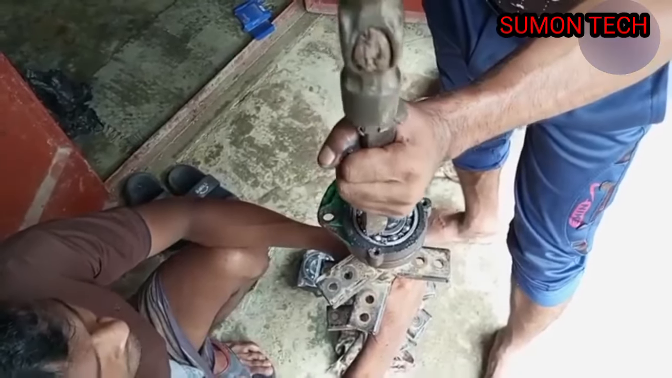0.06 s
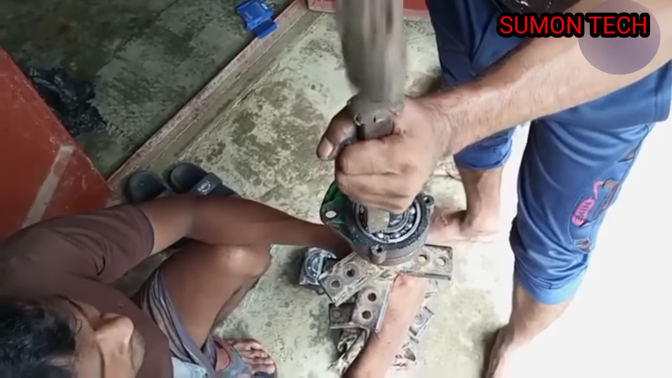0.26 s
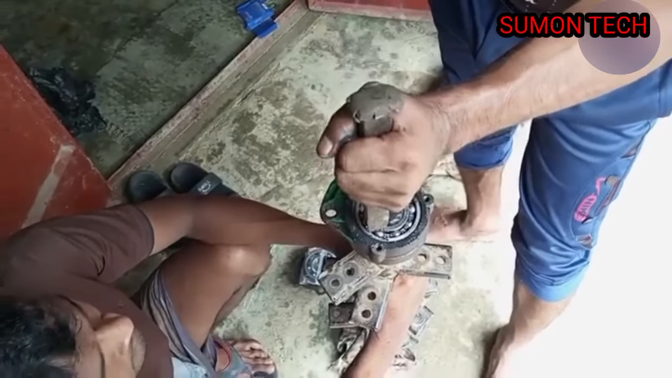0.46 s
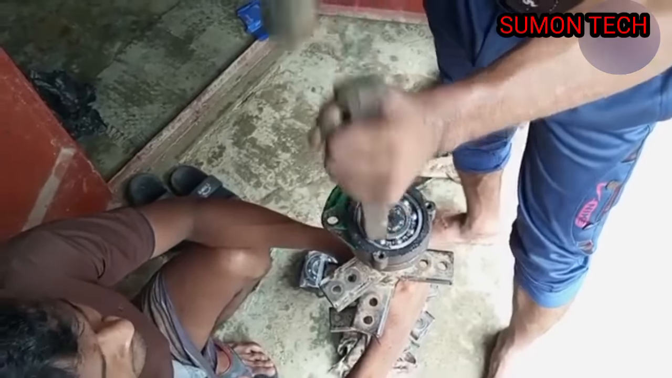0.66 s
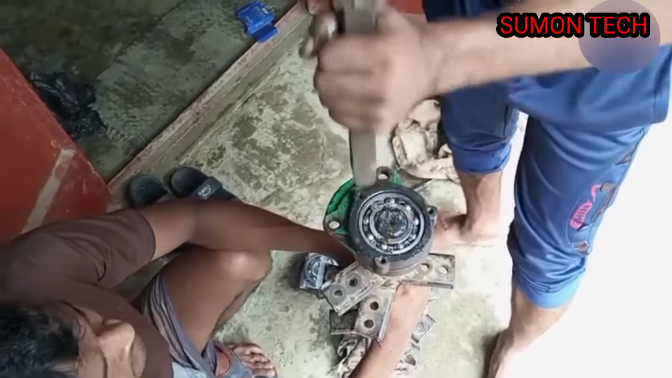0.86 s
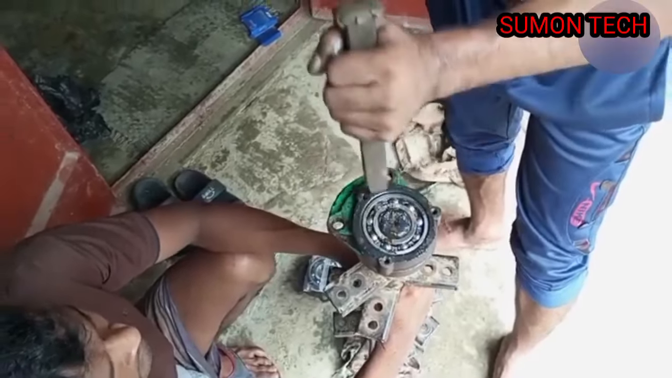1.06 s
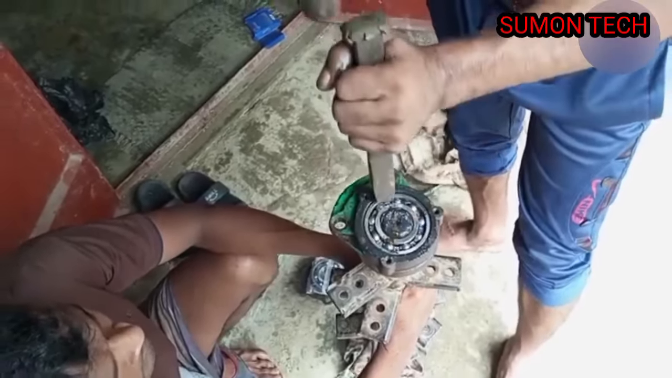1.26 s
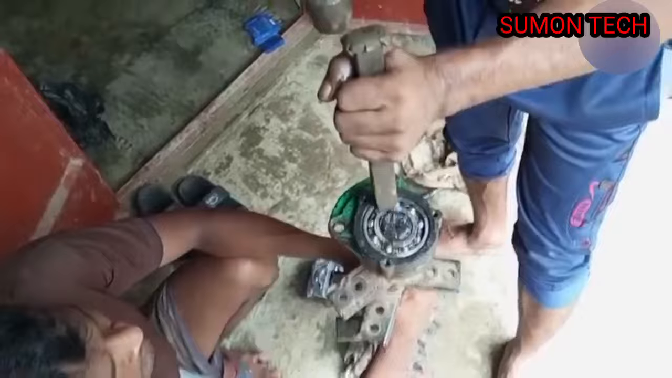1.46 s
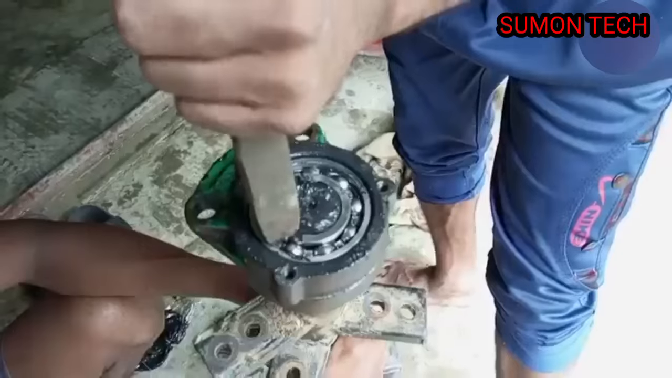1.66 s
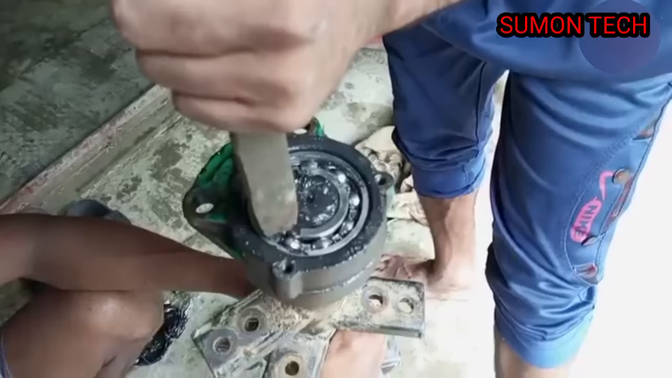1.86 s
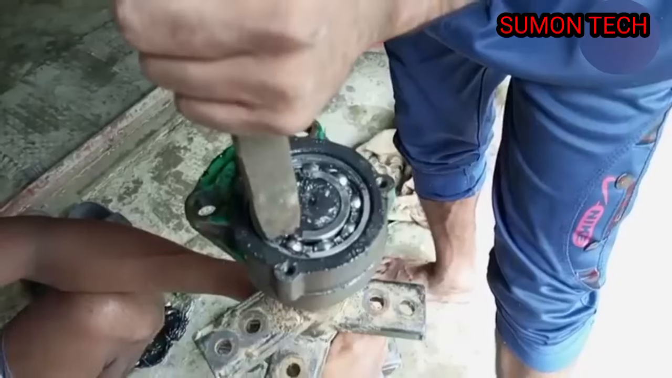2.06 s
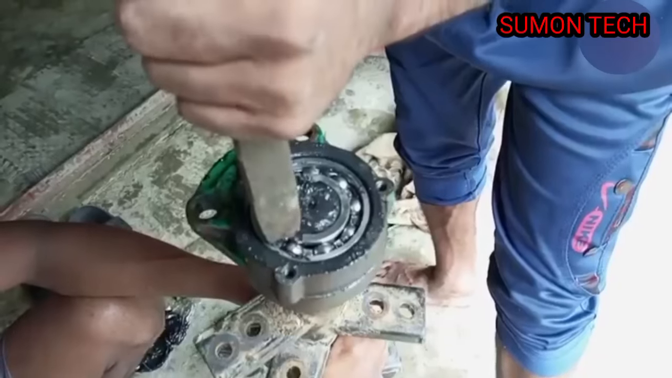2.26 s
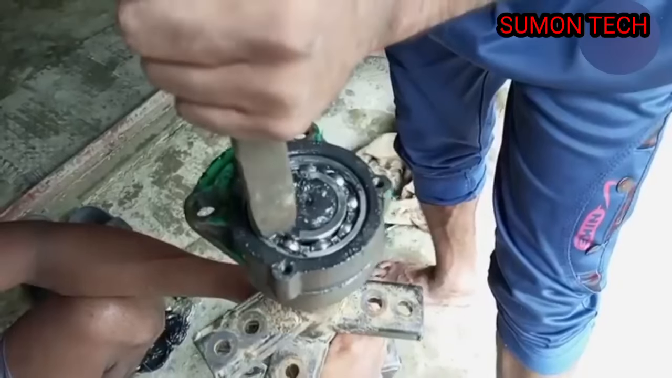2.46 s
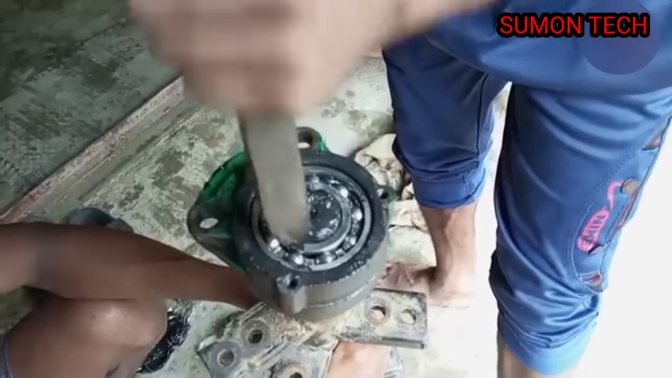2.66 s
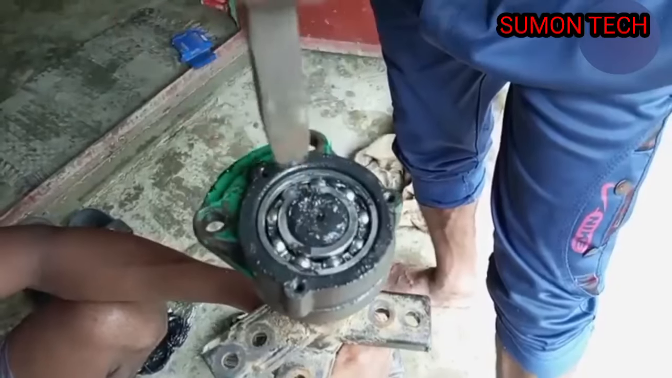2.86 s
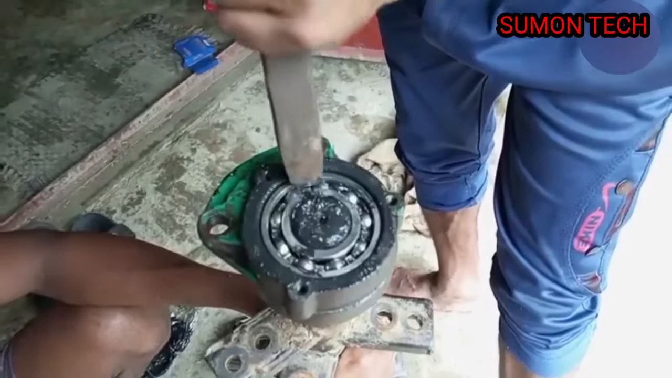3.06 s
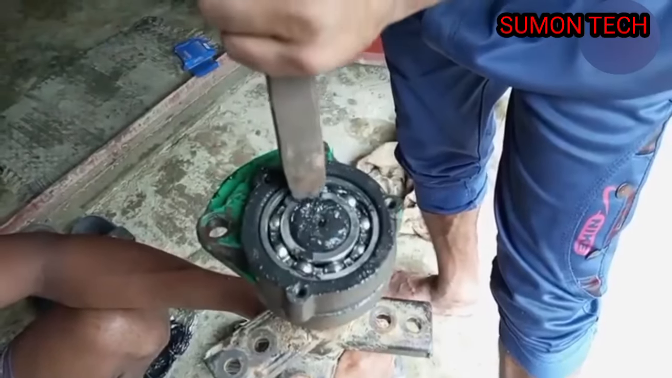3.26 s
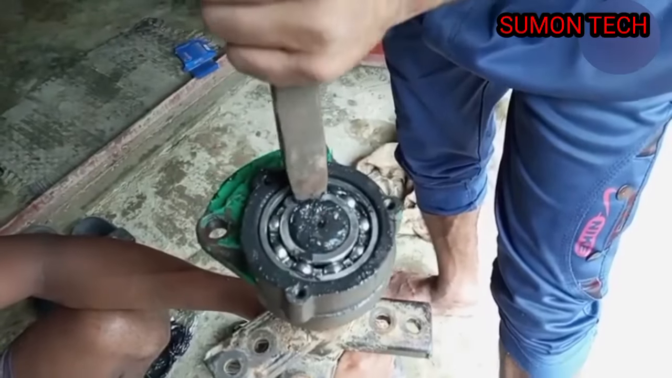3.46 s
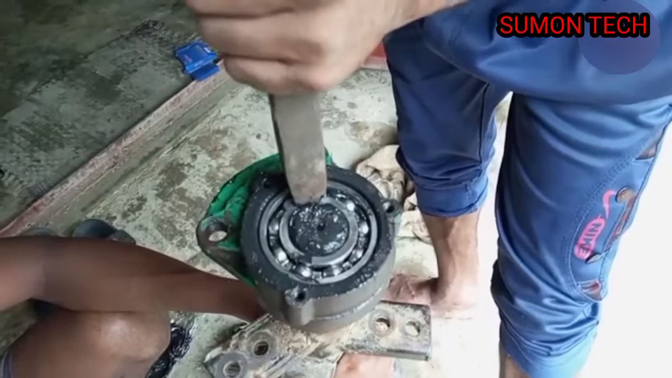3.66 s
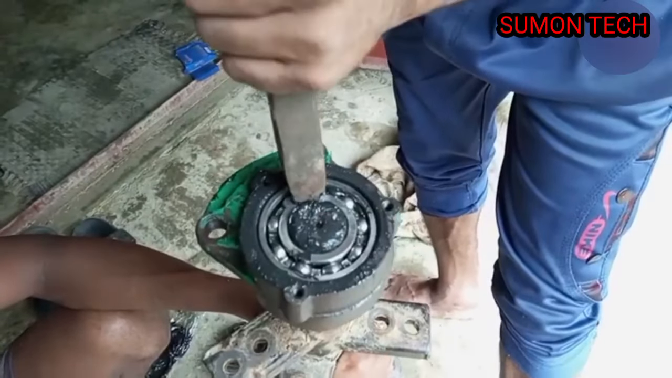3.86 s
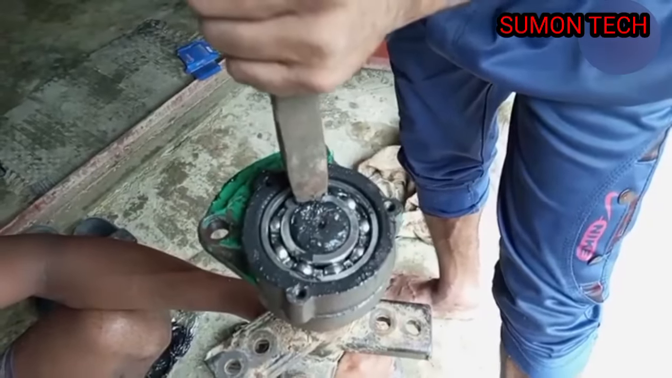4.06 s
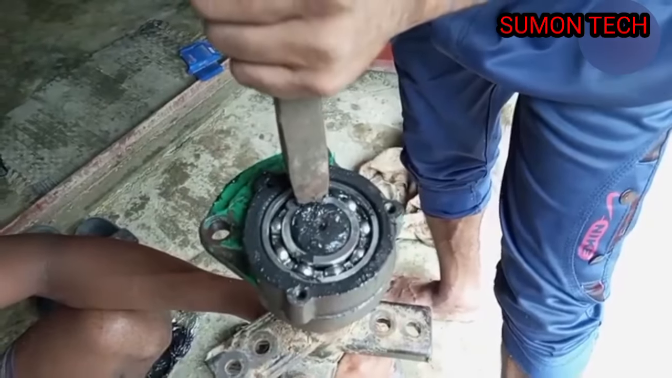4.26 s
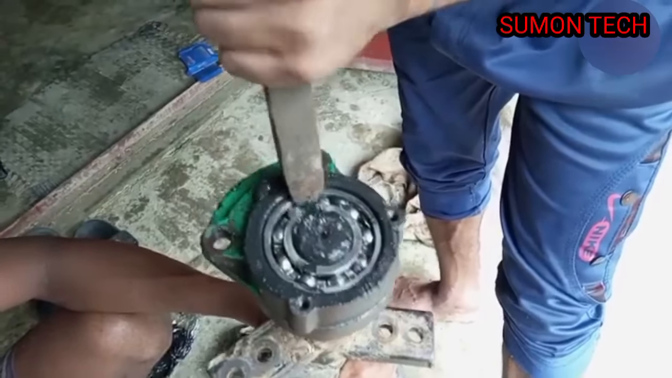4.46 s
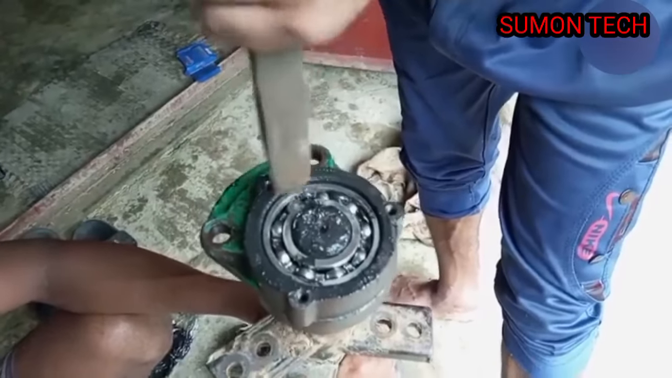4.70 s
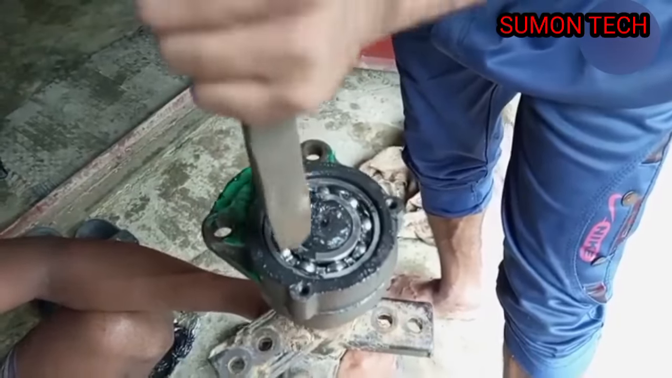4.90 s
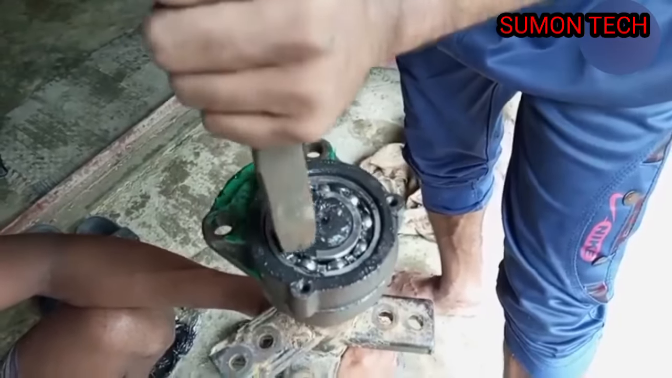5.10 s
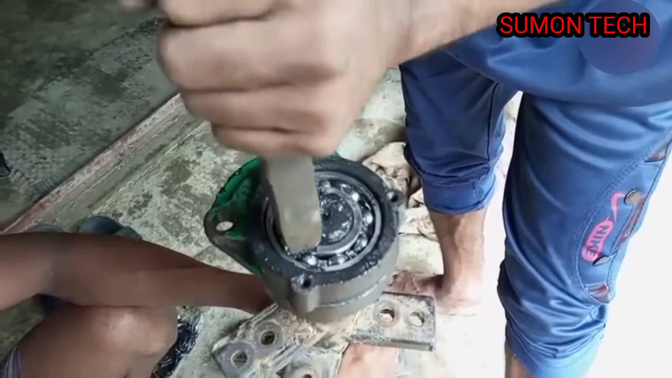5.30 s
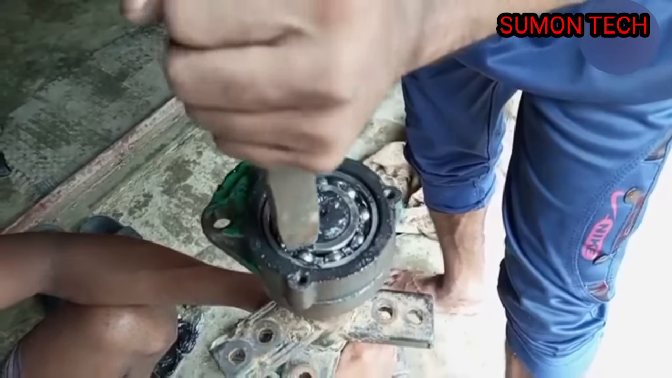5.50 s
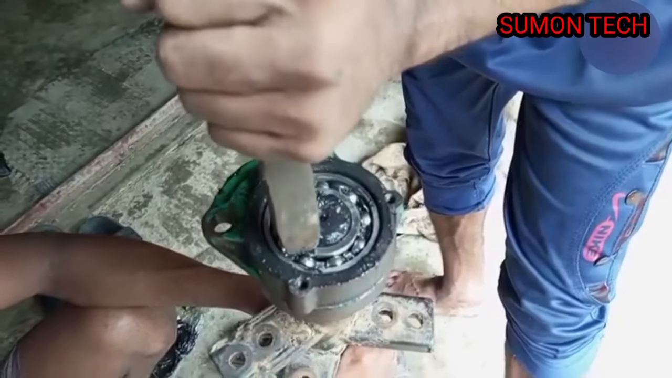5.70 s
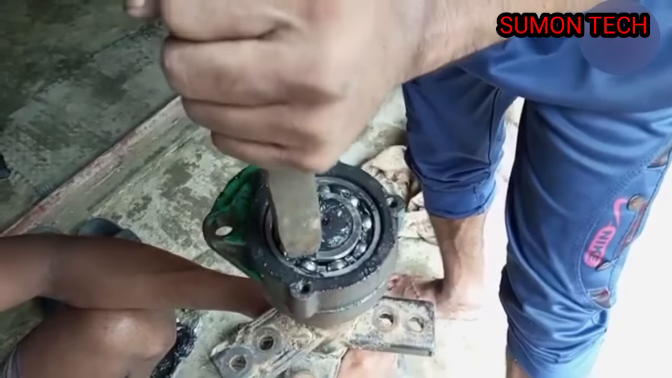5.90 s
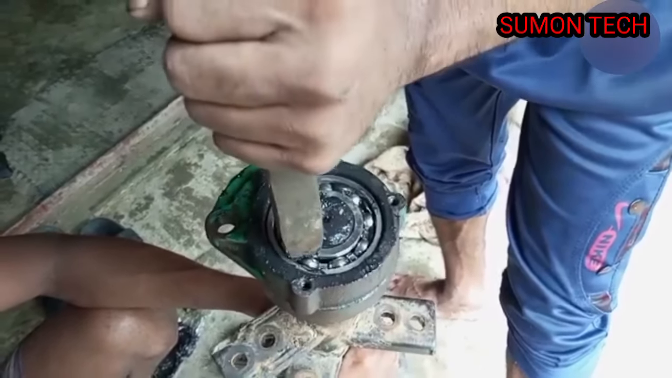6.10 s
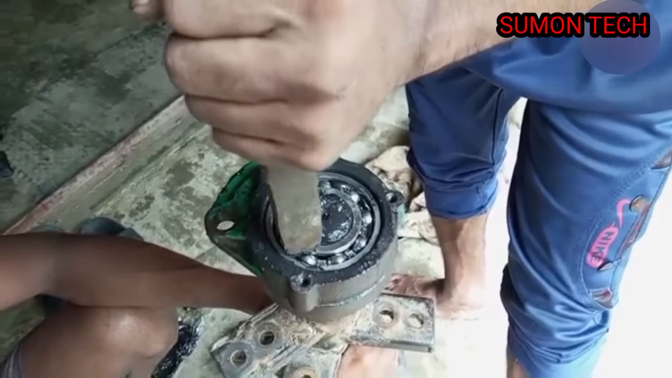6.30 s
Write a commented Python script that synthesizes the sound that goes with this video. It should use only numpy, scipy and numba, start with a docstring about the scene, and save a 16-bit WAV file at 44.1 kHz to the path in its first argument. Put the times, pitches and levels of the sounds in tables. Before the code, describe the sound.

A harsh heavy clang comes first, then a lighter clink, and the pair repeats at a steady pace, ending on another heavy blow. Heavy hits thud, rattle and ring for about half a second; taps are short and fist-damped. Small metallic ticks, dull knocks and faint jingling fill the gaps. A close phone outdoors captures unsteady airy hiss and rumble, with its gain squeezing the peaks.

```python
"""Outdoors, a phone close above a bearing in a metal housing on loose plates, as a hammer drives a hand-held chisel.
Light setting taps and heavy blows alternate, built from decaying modes and bursts of noise for bouncing contacts.
Small parts tick, knock and jingle between them as short modes and bursts, over wavering noise: hiss and rumble.
The phone's gain control looks ahead and ducks everything under the hits; peaks are rounded and the top cut."""
import sys
import numpy as np
from scipy import signal
from scipy.fft import rfft, irfft
from scipy.io import wavfile
from scipy.ndimage import uniform_filter1d, minimum_filter1d
from numba import njit

SR = 44100
rng = np.random.default_rng(int(sys.argv[2]) if len(sys.argv) > 2 else 0)


def to_wav(sig):
    """Store sig (one row per channel, or 1-D mono) as 16-bit WAV at the path in sys.argv[1].

    Samples outside -1..1 are clipped; the rate is SR.
    """
    pcm = np.clip(np.atleast_2d(sig), -1, 1) * 32767
    pcm = np.round(pcm).astype(np.int16)
    wavfile.write(sys.argv[1], SR, pcm.T)  # frames by channels


N = 279594
T = np.arange(N) / SR

# All levels are relative, ahead of the phone's gain control.
# Spectrum of the outdoor hiss: (frequency [Hz], density [dB per Hz])
HISS_SPECTRUM = [(150, -53), (250, -10), (353, -5.5), (458, -7), (499, -5.5), (694, -5.5), (1320, -5),
                 (2060, -0.5), (3980, -9.5), (5530, -16.5), (6680, -18), (9780, -23), (15600, -39)]
# Resting hiss: (level below about 4.5 kHz [dB], from there to about 11 kHz [dB], above [dB])
HISS_REST = (-34, -46, -63)
# Slow drift of those three bands about rest: (time [s], low change [dB], middle change [dB], top change [dB])
HISS_DRIFT = [(0, 1.3, 1.5, 8.5), (.25, -4, -3, 5), (.6, 0.6, -0.26, 11), (1.1, -0.5, -1, 2.72),
              (1.38, 1, 5.5, 2.04), (1.95, 0.5, -0.65, -.8), (2.5, 0, 2, 4), (3.05, -0.75, -2, -0.5),
              (4, 1.5, 2.5, 4), (4.5, 0.2, 0.9, 3.24), (5.55, 0.2, 0, 2.5), (6.34, 1.5, 2.2, 1.5)]
# Spectrum of the low rumble: (frequency [Hz], density [dB per Hz])
RUMBLE_SPECTRUM = [(20, -25.5), (60, -17.5), (100, -3), (160, -0.5), (240, -3), (330, -31)]
# Moments when the bass drops out: (middle time [s], depth [dB], half length [s])
BASS_DROPOUTS = [(0.056, 10, 0.032), (0.202, 6.5, .05), (1.245, 31, 0.097), (1.48, 10.5, .05),
                 (1.64, 19.5, 0.042), (2.71, 8, .04), (2.88, 14, .07), (3.13, 16, 0.055),
                 (3.265, 17.5, 0.0585), (3.52, 5.5, .1), (3.926, 23, .11), (4.64, 22, 0.106),
                 (4.91, 4.5, 0.037), (5.103, 31, 0.072), (5.271, 17, .08), (5.525, 23, 0.06),
                 (5.937, 14, .09)]
# Crisp ticks of loose parts: (time [s], level [dB], treble over that level [dB], t60 [s])
PART_TICKS = [(0.131, -25.5, -11, 0.13), (0.7826, -23.5, -4, 0.092), (1.1796, -26, -13, 0.153),
              (1.7686, -19, -13, 0.22), (1.8978, -17.5, -8.5, 0.16), (2.313, -27, -13, 0.11),
              (2.3444, -19, -15, 0.062), (2.9406, -25, -15, 0.11), (3.0161, -22.5, -9, 0.12),
              (3.1755, -24, -11, 0.19), (3.3113, -21.5, -8.5, 0.078), (3.5214, -34.5, -9, 0.11),
              (3.767, -21.5, -11, 0.12), (3.8385, -26, -13, 0.12), (4.394, -22, -14, 0.114),
              (4.9173, -17.5, -11, 0.16), (5.3495, -28.5, -2.5, 0.134), (5.877, -22.5, -11, 0.12),
              (6.0408, -30, -13, 0.13)]
# Heavy blows, one led by a glancing touch: (time [s], bass roll [dB], ring [dB], rattle length [s], thud [dB],
# clank [dB], clank pitch [Hz], sizzle [dB], shimmer [dB], buzz [dB])
HEAVY_BLOWS = [(.252, -43, 9, 0.0131, -0.5, -2.5, 3280, -10.5, -32, -18.5),
               (2.1332, -66, -13, 0.00154, -8.5, -6, 4120, -17, -4, -28),
               (2.141, -43.5, 7, 0.0145, -5, -6, 4580, -15, -15, -19),
               (4.05, -42.5, 9.5, 0.022, -7, -8.5, 3230, -11, -13, -19),
               (6.069, -42, 9.5, 0.02385, -6.5, -5.5, 4090, -9, -28, -16.5)]
# Column of levels in HOUSING_MODES that each blow excites: (spot [index])
STRUCK_SPOTS = (0, 4, 1, 2, 3)
# Modes of housing and plates: (frequency [Hz], undamped t60 [s], level struck at spot 0 [dB], 1 [dB], 2 [dB],
# 3 [dB], level under a light tap or glancing touch [dB])
HOUSING_MODES = [(1554, 0.92, -35, -38, -47, -38.5, -56), (1968, 0.557, -39, -28.5, -31, -29, -25),
                 (2320, 0.4, -32, -32, -34.5, -29, -26.5), (2370, 0.73, -32.5, -41, -33.5, -35, -31),
                 (2514, 0.403, -21.5, -39, -31.5, -23.5, -43), (2640, 0.984, -27, -29.5, -37, -30, -32),
                 (2694, 0.73, -44, -42, -24, -32, -27), (2763, 0.72, -23, -46.5, -43, -29.5, -28),
                 (2797, 0.694, -44.5, -50, -24, -42.5, -34), (2867, 0.674, -31, -45, -29.5, -42, -38),
                 (2920, 0.73, -27.5, -48, -44.5, -49, -35.5), (3090, 0.75, -42.5, -33, -41, -51.5, -47),
                 (3250, 0.69, -32, -49, -29.5, -52, -45.5), (3355, 0.25, -30, -42.5, -36, -43, -57),
                 (3380, 0.403, -28.5, -47, -35, -47.5, -45.5), (3510, 0.84, -36, -46, -36.5, -39.5, -44),
                 (3677, 0.441, -21, -25.5, -38.5, -38, -30), (3950, 0.88, -38, -26.5, -37, -28, -52),
                 (4005, 0.55, -28.5, -27.5, -30.5, -21, -44), (4170, 0.44, -39, -27.5, -30, -23, -55),
                 (4370, 0.54, -50, -29, -34, -28.5, -59), (4710, 0.82, -44, -30, -42, -30, -59),
                 (4760, 0.23, -24, -24, -40, -32, -63), (5000, 0.43, -38, -43, -26.5, -43, -61),
                 (5980, 0.3, -31, -49, -35.5, -35, -68), (6420, 0.356, -42, -41, -39.5, -53, -66),
                 (7070, 0.38, -60, -35.5, -34, -48, -66), (9080, 0.63, -44, -43.5, -41, -49, -68)]
# Dull knocks of the chisel tip on the bearing: (time [s], level [dB], pitch [Hz], tone over that level [dB],
# tone t60 before choking [s])
TIP_KNOCKS = [(.603, -25.5, 2000, 2, 0.084), (.743, -34, 2320, -8, .1), (0.989, -26, 1010, -2.5, .08),
              (1.033, -30, 1020, 4, 0.08), (1.043, -27, 1952, 4, 0.21), (1.84, -21.5, 1500, -12, .15),
              (2.447, -20.5, 1490, -7, .1), (2.465, -20, 2334, -9, .15), (2.52, -23, 1976, -13.5, 0.217),
              (2.563, -25, 1960, -6, .12), (2.772, -22.5, 2670, -12, .12), (2.786, -23, 1955, -2.5, 0.33),
              (2.895, -26, 1480, -5, 0.149), (4.44, -31, 2340, -4, 0.089), (4.494, -29, 1960, -11, 0.105),
              (4.535, -26, 2330, -6, .1), (4.73, -23.5, 1970, -10, .2), (4.822, -21, 1440, -4, 0.16),
              (4.971, -26, 2056, -1, .12), (5.262, -23, 2290, -6.5, .15), (5.365, -24.5, 2190, -6, .15),
              (5.813, -32.5, 1950, -8, .1)]
# Light taps: (time [s], chisel [dB], housing [dB], clack [dB], knock [dB])
LIGHT_TAPS = [(1.687, 8, 7, -12, -19), (3.615, 7.5, 6, -13, -23.5), (5.608, 6, 3.5, -14.5, -24)]
# Modes of the chisel, damped by the fist: (frequency [Hz], t60 [s], level in tap 0 [dB], 1 [dB], 2 [dB])
CHISEL_MODES = [(1440, 0.057, -17, -45, -15), (1962, 0.23, -35, -17.5, -23), (2314, 0.27, -24, -24, -26),
                (2530, 0.28, -23, -28.5, -30.5), (2850, 0.182, -14.5, -18, -16),
                (3380, 0.259, -27.5, -20.5, -33.5), (3910, 0.085, -33, -17.5, -23),
                (4900, .08, -38, -44, -33), (6880, 0.087, -46.5, -32, -54), (10800, 0.106, -41.5, -39, -39)]

# after each full blow the hiss shifts: delay to the turning point, change of the low, middle and top band
AFTER_BLOW_S, AFTER_BLOW_DB = 0.11, (1.5, 7.5, -8)
HISS_SWELL_DB, TREBLE_FLICKER_DB = 0.9, 1.84  # random wavering shared by all hiss bands, by the treble
BASS_DB, BASS_WAVER_DB = -55, 2.5  # resting level and its random wavering
BOOM_OVER_ROLL_DB, BOOM_RISE_S, BOOM_T60_S = 16, 0.011, 0.25
ROLL_TOP_S, TAP_ROLL_DB, TAP_TOP_S = 0.12, -53.5, 0.065  # bass roll after blows, then after taps
TOP_HZ = 15450


def undb(db):
    """Decibels to an amplitude factor."""
    return 10 ** (np.asarray(db) / 20)


def unit(x):
    """Scale to an RMS of 1."""
    return x / np.sqrt(np.mean(x ** 2))


def fade(t, t60):
    """Exponential decay by 60 dB in t60 seconds."""
    return np.exp(-np.log(1000) * t / t60)


def add(out, s, x):
    """Lay a sound into the mix from s seconds on."""
    i = int(s * SR)
    out[i:i + len(x)] += x[:N - i]


def curve(table):
    """Each column after the time, interpolated over the whole scene."""
    s, *columns = np.transpose(table)
    return [np.interp(T, s, column) for column in columns]


def band(x, lo_hz, hi_hz):
    """Band-passed noise with an RMS of 1."""
    sos = signal.butter(3, [lo_hz, hi_hz], "bandpass", fs=SR, output="sos")
    return unit(signal.sosfilt(sos, x))


def walk(rate, count=N):
    """Random levels held 1 / rate s and slewed twice; spread near 1."""
    k = int(SR / rate)
    steps = np.repeat(rng.standard_normal(count // k + 1), k)
    return 1.3 * uniform_filter1d(uniform_filter1d(steps, k), k)[:count]


def colour(noise, table):
    """Spectrum of the noise weighted by (frequency [Hz], level [dB]) points."""
    hz, db = np.transpose(table)
    log_hz = np.log(np.fft.rfftfreq(N, 1 / SR) + 1)
    return rfft(noise) * undb(np.interp(log_hz, np.log(hz), db, left=-80))


def swell_after(times, top_s):
    """Humps, one row per time, that rise from it, top out at 1 after top_s and sink away."""
    x = np.maximum(T - np.array(times)[:, None], 0) / top_s
    return x * np.exp(1 - x)


@njit
def high_pass(x, hz):
    """State-variable high-pass whose corner moves."""
    y, b, l = np.empty(len(x)), 0., 0.
    for i in range(len(x)):
        g = np.tan(np.pi * hz[i] / SR)
        v = (b + g * (x[i] - l)) / (1 + g * (g + 1.4))
        y[i] = x[i] - 1.4 * v - l - g * v
        b, l = 2 * v - b, l + 2 * g * v
    return y


def bass_level():
    """Bass level in dB: a wavering rest, rolls after the hits, dropouts, and a boom at each blow."""
    s, roll_db = np.transpose(HEAVY_BLOWS)[:2, :, None]
    since = np.maximum(T - s, 0)
    boom_shape = (1 - np.exp(-since / BOOM_RISE_S)) * fade(since, BOOM_T60_S)
    boom = (undb(roll_db + BOOM_OVER_ROLL_DB) * boom_shape).sum(axis=0)
    roll = (undb(roll_db) * swell_after(s[:, 0], ROLL_TOP_S)).sum(axis=0)
    stir = undb(TAP_ROLL_DB) * swell_after([row[0] for row in LIGHT_TAPS], TAP_TOP_S).sum(axis=0)
    dropouts_db = sum(db * np.exp(-((T - at) / half) ** 2) for at, db, half in BASS_DROPOUTS)
    waver = undb(BASS_WAVER_DB * walk(14) - dropouts_db)
    return 10 * np.log10((undb(BASS_DB) ** 2 + roll ** 2 + stir ** 2) * waver ** 2 + boom ** 2)


def hiss(bass_db):
    """Third-octave bands of grainy noise waver alone and together; the low end is cut as the bass falls silent."""
    full_blows = [row[0] for row in HEAVY_BLOWS if row[2] > 0]  # leaves out the glancing touch
    after = swell_after(full_blows, AFTER_BLOW_S).sum(axis=0) ** 2
    levels_db = np.array(curve(HISS_DRIFT)) + np.c_[list(HISS_REST)] + np.c_[list(AFTER_BLOW_DB)] * after
    grains = undb(1.5 * np.minimum(rng.exponential(size=N), 4))
    whole = colour(rng.standard_normal(N) * grains, HISS_SPECTRUM)
    place = 3 * np.log2((np.fft.rfftfreq(N, 1 / SR) + 1) / 125)  # third octaves above 125 Hz
    swell, flicker, parts = walk(12), walk(18), np.zeros((3, N))
    for k in range(22):
        share = np.cos(np.pi / 2 * np.clip(place - k, -1, 1)) ** 2
        waver_db = 1.4 * walk(14) + HISS_SWELL_DB * swell + TREBLE_FLICKER_DB * (k > 16) * flicker
        parts[int(k > 15) + int(k > 19)] += irfft(whole * share, N) * undb(waver_db)
    body = sum(undb(db) * unit(part) for db, part in zip(levels_db, parts))
    corner_hz = np.clip(130 * undb(-.35 * (bass_db + 48.0)), 20, 900)
    return high_pass(high_pass(body, corner_hz), corner_hz)


def rumble(bass_db):
    """Low noise that follows the bass level: rest, rolls, dropouts and booms."""
    return undb(bass_db) * unit(irfft(colour(rng.standard_normal(N), RUMBLE_SPECTRUM), N))


def jingle(level_db=-47, count=1500):
    """Faint pings of loose metal all the time, each a short mode of its own between 1100 and 3300 Hz."""
    out, t = np.zeros(N), T[:SR // 16]
    for when, pitch, life, size in rng.random((count, 4)):
        envelope = fade(t, 0.0235 + 0.061 * life) * (1 - fade(t, 0.0077))
        ping = envelope * np.sin(2 * np.pi * 1100 * 3 ** pitch * t)
        add(out, when * T[-1], undb(level_db - 3 * np.log(size + .03)) * ping)  # a few are louder
    return out


def rattle(length_s, t60, lo_hz, hi_hz, spiky_db=2.5, first_db=8, lumpy_db=3):
    """One sharp first contact, then dense ones of uneven size while the parts bounce, dying away."""
    t = T[:int((length_s + t60) * SR)]
    spikes = undb(spiky_db * np.minimum(rng.exponential(size=len(t)), 4))
    bunches = undb(lumpy_db * walk(350, count=len(t)))  # bounces come in bunches
    contacts = rng.standard_normal(len(t)) * spikes * bunches
    shape = fade(np.maximum(t - length_s, 0), t60) + undb(first_db) * fade(t, 0.0015)
    return band(contacts, lo_hz, hi_hz) * shape


def ticks():
    """Loose parts touch in short bursts of contacts that reach far into the treble."""
    out = np.zeros(N)
    for s, db, treble_db, t60 in PART_TICKS:
        add(out, s, undb(db - 9.5) * rattle(0.01, t60, 1180, 4400, first_db=-6))
        add(out, s, undb(db + treble_db - 9.0) * rattle(0.0047, t60, 3420, 11300, first_db=-9))
    return out


def ring(hz, t60, db, rough, spread=.025, rise_s=0.01, choke_s=0.37):
    """Decaying modes, each in a skirt of noise from chattering contacts; the ring chokes as the parts settle."""
    t = T[:SR * 6 // 10]
    out = np.zeros(len(t))
    for f, d, g in zip(hz, t60, db):
        tone = np.ones(len(t), complex)
        for width in (spread, 4 * spread):  # slow rocking smears the line, quick chatter fills the gaps
            steps = np.arange(0, t[-1], 1 / (width * f))
            nudge, turn = (np.interp(t, steps, r) for r in rng.standard_normal((2, len(steps))))
            tone += rough * np.sqrt(f / 3000) * (nudge + 1j * turn)
        carrier = np.exp(2j * np.pi * (f * t + rng.random()))
        out += undb(g) * fade(t, d) * (tone * carrier).imag
    return out * (1 - np.exp(-t / rise_s)) * np.exp(-(t / choke_s) ** 4)


def housing(spot, damping=1., early_db=8, early_t60=0.15):
    """The housing rings long once the fist and the floor have soaked up an early extra swing."""
    hz, t60, *db = np.transpose(HOUSING_MODES)
    x = ring(hz, t60 / damping, db[spot], rough=.48, rise_s=.003)
    return x * (1 + undb(early_db) * fade(T[:len(x)], early_t60))


def blows():
    """Thud of the floor, clank and sizzle of the parts, shimmer of the caged balls, buzz of the plates, ring."""
    out = np.zeros(N)
    for spot, row in zip(STRUCK_SPOTS, HEAVY_BLOWS):
        s, _, ring_db, length, thud_db, clank_db, clank_hz, sizzle_db, shimmer_db, buzz_db = row
        short = min(length / .015, 1) ** .5  # a glancing touch dies sooner
        add(out, s, undb(thud_db) * rattle(length, 0.05 * short, 173, 2240))
        add(out, s, undb(clank_db) * rattle(length, .1 * short, clank_hz / 1.45, clank_hz * 1.2))
        add(out, s, undb(sizzle_db) * rattle(length / 2, 0.14 * short, 4200, 12470))
        # the shimmer: a short burst, then two fainter, longer tails
        add(out, s, undb(shimmer_db) * rattle(length, 0.085 * short, 8000, 9175))
        add(out, s, undb(shimmer_db - 21.5) * rattle(length, 0.99 * short, 8630, 9900))
        add(out, s, undb(shimmer_db - 30) * rattle(length, 0.6 * short, 11600, 12800))
        add(out, s, undb(buzz_db) * rattle(length, 0.68 * short, 1600, 4670))
        add(out, s, undb(buzz_db - 16) * rattle(length, 0.45 * short, 5000, 13200))
        add(out, s, undb(ring_db) * housing(spot))
    return out


def knocks():
    """The chisel tip knocks on the bearing: contacts that stay low, and one soon-choked mode for the pitch."""
    out = np.zeros(N)
    for s, db, hz, tone_db, t60 in TIP_KNOCKS:
        add(out, s, undb(db - 9.5) * rattle(0.0145, 0.16, 943, 3760, first_db=-15))
        add(out, s, ring([hz], [t60], [db + tone_db], rough=.35, rise_s=0.0015, choke_s=t60 / 3.74))
    return out


def taps():
    """A soft contact: little treble, the chisel rings briefly, the held housing is choked."""
    out = np.zeros(N)
    hz, t60, *db = np.transpose(CHISEL_MODES)
    for number, (s, chisel_db, housing_db, clack_db, knock_db) in enumerate(LIGHT_TAPS):
        add(out, s, undb(chisel_db) * ring(hz, t60, db[number], rough=.38, rise_s=.0003))
        add(out, s, undb(housing_db) * housing(-1, damping=1.93, early_db=-2))
        # the chisel bounces
        add(out, s, undb(clack_db) * rattle(.02, .14, 1500, 3600, spiky_db=5, first_db=15))
        # the first contact: a short round knock
        add(out, s, ring([1950], [.018], [clack_db + 13], rough=0.12, rise_s=0.0003))
        add(out, s, undb(knock_db) * rattle(0.00235, 0.14, 104, 1600))
        add(out, s, undb(clack_db - 18) * rattle(.003, 0.057, 4500, 12500))
    return out


def scene():
    """Hiss and rumble share one bass level; the metal sounds lie on top."""
    bass_db = bass_level()
    background = hiss(bass_db) + rumble(bass_db) + jingle()
    return (background + ticks() + blows() + knocks() + taps())[None]


@njit
def follow(x, attack, release):
    """Level follower with separate rates for rising and falling."""
    y, e = np.empty(len(x)), x[0]
    for i in range(len(x)):
        e += (x[i] - e) * (attack if x[i] > e else release)
        y[i] = e
    return y


def record(dry, knee_db=-22, ratio=2.02, ahead_s=0.01403, attack_s=0.012, release_s=0.043):
    """The phone: gain control that sees a hit coming, soft peak rounding, steep top cut."""
    ahead = int(ahead_s * SR)
    size = np.sqrt(np.maximum(uniform_filter1d(dry[0] ** 2, size=128), 1e-12))
    size = -minimum_filter1d(-size, size=ahead, origin=-(ahead // 2))  # loudest moment just ahead
    excess = np.log(np.maximum(size / undb(knee_db), 1))
    over = follow(excess, 1 / (attack_s * SR), 1 / (release_s * SR))
    ducked = dry * np.exp(-over * (1 - 1 / ratio))
    rounded = np.tanh(1.0916 * ducked) / 1.1055
    return signal.sosfilt(signal.ellip(8, .2, 70, TOP_HZ, fs=SR, output="sos"), rounded)


dry = scene()
out = record(dry)
to_wav(out)
```